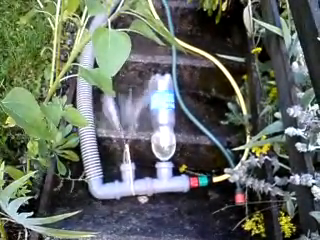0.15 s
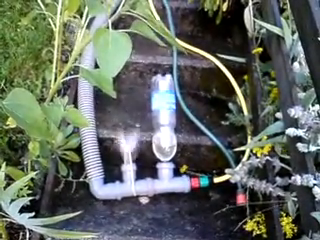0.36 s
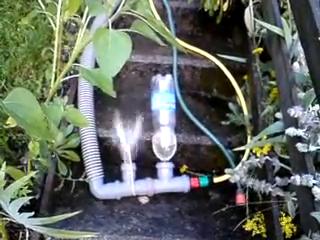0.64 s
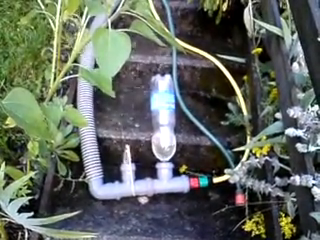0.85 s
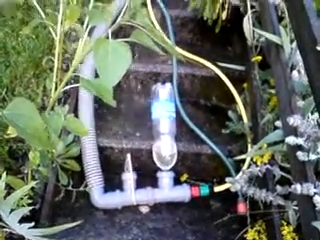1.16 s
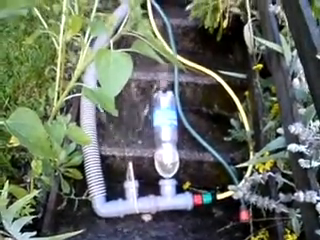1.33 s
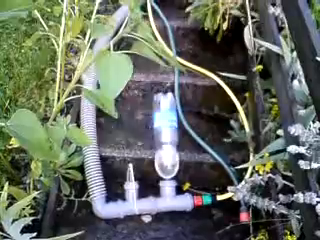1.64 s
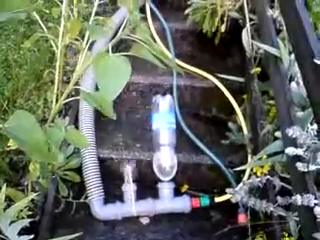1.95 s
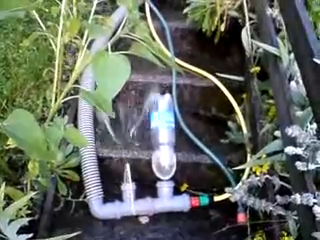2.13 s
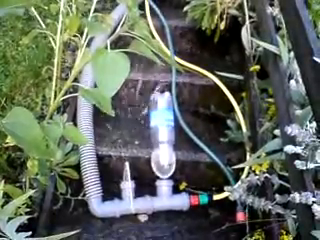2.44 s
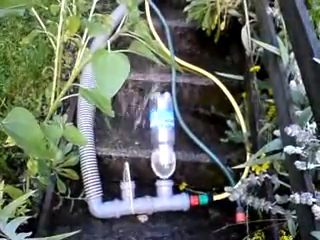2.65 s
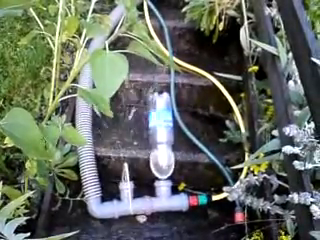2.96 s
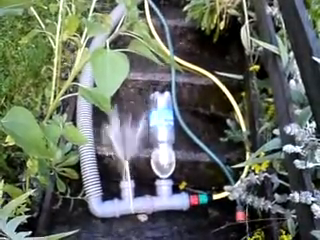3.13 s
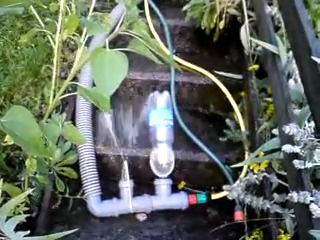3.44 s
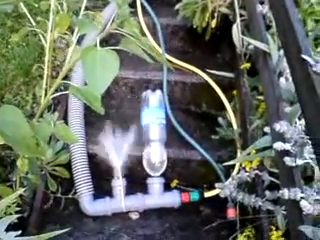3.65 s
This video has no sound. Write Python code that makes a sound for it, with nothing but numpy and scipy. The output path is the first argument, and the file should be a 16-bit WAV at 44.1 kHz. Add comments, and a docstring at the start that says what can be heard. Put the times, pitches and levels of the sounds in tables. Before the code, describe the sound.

Sharp, even clacks come from a small water pump on stone garden steps. Each quick cycle brings a hiss of water, a lighter shutting clack and a soft splash, with scattered drips and faint trickling behind.

```python
"""On stone garden steps, a small hydraulic ram pump cycles nearly four times a second.
Its waste valve drops open with a clack, water spurts out with a growing hiss and slams it shut
with a bounce, a knock in the pipe and a few bloops of air. The thrown water then splashes down
and stray drops tick on the wet stone, over a faint outdoor rumble and trickling run-off."""
import sys
import numpy as np
from scipy import signal
from scipy.fft import rfft, irfft
from scipy.io import wavfile

SR = 44100
rng = np.random.default_rng(int(sys.argv[2]) if len(sys.argv) > 2 else 0)


def store_wav(level_fs):
    """Save 16-bit WAV to argv[1]."""
    pcm = np.round(np.clip(np.atleast_2d(level_fs), -1, 1) * 32767)
    wavfile.write(sys.argv[1], SR, pcm.T.astype(np.int16))


N = 167139

# The valve drops open. Each row: time in seconds, level in dB, ring pitch in Hz, rise in seconds.
OPENINGS = [(0.195, -25.5, 3490, 0.0029), (0.4693, -25, 3700, 0.0012), (0.7408, -23.5, 3370, 0.0031),
            (1.0134, -25.7, 3510, 0.0024), (1.2857, -24, 3500, 0.0036), (1.5558, -25, 3500, 0.0013),
            (1.827, -25.5, 3410, .0019), (2.0989, -25, 3470, .0018), (2.3716, -24, 3550, 0.0023),
            (2.6442, -25.5, 3790, 0.0021), (2.9161, -25.5, 3650, 0.00072), (3.185, -26, 3900, 0.0017),
            (3.467, -23.5, 3410, 0.0022), (3.743, -25, 3710, 0.0027)]
# The valve slams shut. Each row: time in seconds, level in dB, ring pitch in Hz,
# relative level in dB of the jet that leads up to it.
SLAMS = [(0.0436, -27, 3720, -41), (0.3194, -28.5, 2920, -41), (0.5894, -31.5, 3140, -42),
         (0.8629, -31, 3620, -41), (1.136, -29, 3080, -41), (1.4058, -32, 3490, -42),
         (1.6771, -29, 3580, -42), (1.9487, -30, 3640, -41.5), (2.2195, -29.5, 3800, -41.5),
         (2.4948, -28.5, 3450, -40.5), (2.767, -28.5, 3570, -42.5), (3.0356, -29, 3430, -42),
         (3.3163, -29, 3350, -38.5), (3.5914, -33.5, 3600, -41)]


def amp(db):
    return 10 ** (np.asarray(db) / 20)


def unit_rms(x):
    return x / np.sqrt(np.mean(x ** 2) + 1e-20)


def sized(x, span_s):
    """Scales a short sound to the energy of rms 1 held for span_s."""
    return x / np.sqrt(np.sum(x ** 2) / (span_s * SR) + 1e-20)


def add(mix, start_s, sound):
    """Mixes a sound in, trimming whatever overhangs either end."""
    at = round(start_s * SR)
    part = mix[max(at, 0):max(at + len(sound), 0)]
    part += sound[max(-at, 0):][:len(part)]


def coloured(x, curve, size=4096):
    """Minimum-phase EQ through points of frequency in Hz and gain in dB."""
    hz, db = np.transpose(curve)
    bin_hz = abs(np.fft.fftfreq(size, 1 / SR)) + 1
    log_gain = np.log(amp(np.interp(np.log(bin_hz), np.log(hz), db)))
    taps = np.fft.ifft(np.exp(np.conj(signal.hilbert(log_gain)))).real[:size // 2]
    return signal.fftconvolve(x, taps)[:len(x)]


def flutter(rate_hz, depth_db):
    """A randomly wavering gain."""
    hz = np.fft.rfftfreq(N, 1 / SR)
    wander = irfft(rfft(rng.standard_normal(N)) / (1 + (hz / rate_hz) ** 4), N)
    return amp(depth_db * unit_rms(wander))


def droplets(per_s, spread_db):
    """Tiny random impacts of unequal size."""
    size = amp(spread_db * np.minimum(rng.exponential(1, N), 4))
    return unit_rms(size * rng.choice([-1, 1], N) * (rng.random(N) < per_s / SR))


def bubbles(per_s, spread_db, hz, octaves, cycles, count=36):
    """Tiny bubbles of many sizes, each a short ping that rises slightly."""
    births = np.flatnonzero(rng.random(N) < per_s / SR)
    pitch_index = rng.integers(0, count, N)
    gain = amp(spread_db * np.minimum(rng.exponential(1, N), 3.5))
    out, t = np.zeros(N + 600), np.arange(600) / SR
    for k, pitch_hz in enumerate(hz * 2 ** (octaves * np.linspace(-1, 1, count))):
        turns = pitch_hz * t
        envelope = (1 - np.exp(-turns)) * np.exp(-turns / cycles)
        ping = envelope * np.sin(2 * np.pi * turns * (1 + 0.001 * turns))
        starts = births[pitch_index[births] == k]
        samples = starts[:, None] + np.arange(len(t))
        out += np.bincount(samples.ravel(), np.outer(gain[starts], ping).ravel(), len(out))
    return unit_rms(out[:N])


def garden():
    """A faint bed of outdoor rumble and trickling run-off."""
    # The tone of the bed. Each row: frequency in Hz, gain in dB.
    bed_eq = [(20, -2.5), (45, 0), (65, 5.5), (90, -1), (200, -2.5), (280, -5), (550, -5), (850, 1),
              (1200, -2), (2400, 5.5), (3600, 8), (5000, -3.5), (8200, -13)]
    noise = rng.standard_normal(N) * flutter(rate_hz=25, depth_db=1)
    return amp(-57.5) * unit_rms(coloured(noise, bed_eq))


def step_echoes(x, count=5, predelay_s=0.004, t60_s=0.038):
    """Short scattered reflections off the stone steps, drifting from one pattern to the next."""
    out, t = np.zeros(N), np.arange(SR // 4) / SR
    decay = (t > predelay_s) * amp(-60 * t / t60_s)
    for k in range(count):
        taps = rng.choice([-1, 1], len(t)) * (rng.random(len(t)) < 3000 / SR) * decay
        crossfade = np.sqrt(np.maximum(1 - abs(np.linspace(0, count - 1, N) - k), 0))
        out += signal.fftconvolve(x * crossfade, taps / np.linalg.norm(taps))[:N]
    return amp(-12) * out


def ticks_and_drips():
    """Sharp ticks, mostly drops on stone, each a click, a noise burst and a ping, over small drips."""
    # Sharp ticks: drops on the stone, plus one valve bounce and one tick of the valve unseating.
    # Each row: start in seconds, level in dB, pitch in Hz.
    ticks = [(0.097, -40.5, 3840), (0.158, -45.5, 5400), (0.223, -38, 4030), (.392, -50, 3500),
             (0.623, -39.5, 3680), (0.71, -41, 4440), (0.984, -38, 4480), (0.998, -37.5, 2780),
             (1.092, -35, 3630), (1.221, -43, 2700), (1.352, -33.5, 3460), (1.367, -46, 3500),
             (1.793, -40, 4660), (1.866, -40, 4100), (2.066, -44, 4310), (2.146, -40, 3650),
             (2.185, -34, 3740), (2.352, -36.5, 3260), (2.439, -36, 3740), (2.62, -34.5, 4460),
             (2.665, -37, 2770), (2.677, -44, 3300), (2.689, -40, 3510), (2.722, -36, 3870),
             (2.85, -44, 3840), (2.878, -43.5, 4240), (2.883, -38.5, 4360), (2.962, -41.5, 4030),
             (3.019, -31, 3760), (3.12, -41, 2870), (3.139, -41.5, 3440), (3.166, -40.5, 3710),
             (3.221, -41, 4330), (3.255, -31, 3700), (3.41, -41.5, 5440), (3.503, -36.5, 2960),
             (3.526, -36.5, 3670), (3.542, -33.5, 3270), (3.612, -33, 3500), (3.758, -38.5, 2900),
             (3.768, -35, 3300)]
    # The tone of the ticks and drips. Each row: frequency in Hz, gain in dB.
    tick_eq = [(200, -28), (600, -30), (900, -27.5), (1200, -18.5), (2300, -5.5), (3600, -1), (4600, -2),
               (5500, -7.5), (7000, -7.5), (8300, -21)]
    out, t = np.zeros(N), np.arange(SR // 30) / SR
    click = unit_rms(1. * (t == 0))
    ping_envelope = (1 - np.exp(-t / 0.00035)) * np.exp(-t / 0.0026)
    glide_per_s = 6
    for s, db, hz in ticks:
        burst = unit_rms(rng.standard_normal(len(t)) * (1 - np.exp(-t / 0.001)) * np.exp(-t / 0.0031))
        body = unit_rms(signal.lfilter(*signal.iirpeak(hz, Q=1.1, fs=SR), burst))
        ping = unit_rms(ping_envelope * np.sin(2 * np.pi * hz * t * (1 + glide_per_s * t / 2)))
        hit = body + amp(-8) * burst + ping + amp(-10) * click
        add(out, s, amp(db) * sized(coloured(hit, tick_eq), span_s=0.0071))
    patter = bubbles(per_s=360, spread_db=4, hz=3500, octaves=0.87, cycles=3)
    out += amp(-56) * unit_rms(coloured(patter, tick_eq))
    drip_envelope = signal.fftconvolve(droplets(per_s=60, spread_db=2), t * np.exp(-t / 0.0022))[:N]
    drips = drip_envelope * rng.standard_normal(N)
    return out + amp(-61) * unit_rms(coloured(drips, tick_eq))


def splash(delay_s=0.041, spread_s=0.013):
    """The thrown water lands in a soft shower a moment after each slam."""
    # The tone of the shower. Each row: frequency in Hz, gain in dB.
    shower_eq = [(80, -23), (210, -10), (280, -28), (550, -17), (720, -6), (900, 1), (1020, -0.5),
                 (1200, -16), (1750, -0.5), (2300, -14), (3600, -8), (4600, -7), (6000, -15.5),
                 (8200, -36.5)]
    t = np.arange(N) / SR
    swells = sum(np.exp(-0.5 * ((t - s - delay_s) / spread_s) ** 2) for s, *_ in SLAMS)
    shower = unit_rms(coloured(droplets(per_s=1900, spread_db=2.5), shower_eq))
    return amp(-52.5) * swells * shower


def air_bloops(rise_s=0.0027, glide_per_s=3.5):
    """Pockets of air at the outlet give a few short bloops after each slam, each rising in pitch."""
    # The air pockets. Each row: delay in seconds, pitch in Hz, level in dB, 60 dB decay in seconds.
    pockets = [(.013, 803, -52, 0.033), (.039, 890, -49.5, 0.032), (.047, 817, -50.5, .045)]
    out, t = np.zeros(N), np.arange(SR // 12) / SR
    for s, *_ in SLAMS:
        for delay, hz, db, t60 in pockets:
            late, sharp, loud = rng.standard_normal(3)
            turns = hz * (1 + 0.05 * sharp) * t * (1 + glide_per_s * t / 2)
            envelope = np.minimum(t / rise_s, 1) * amp(db + loud - 60 * t / t60)
            add(out, s + delay + 0.0012 * late, envelope * np.sin(2 * np.pi * turns))
    return out


def jet(lead_s=0.077, rise_s=0.027, growth_db_per_s=32, fall_db_per_s=340.5):
    """Water seeps through the open valve, bursts into a growing spray and dies away after the slam."""
    # The tone of the hiss. Each row: frequency in Hz, gain in dB.
    hiss_eq = [(80, -38), (500, -34.5), (800, -30.5), (1300, -29), (1600, -23.5), (1900, -13), (2200, -15),
               (2850, -6), (3200, -5.5), (3450, -2.5), (3700, -3), (4000, -2.5), (4350, -8.5), (4900, -8.5),
               (5500, -16), (6500, -15), (8200, -28.5)]
    flow, t = np.zeros(N), np.arange(N) / SR
    for s, _, _, db in SLAMS:
        before, after = np.maximum(s - t, 0), np.maximum(t - s, 0)
        spurt = np.clip((lead_s - before) / rise_s, 0, 1)
        seep = amp(-12.5) * np.clip((0.125 - before) / 0.004, 0, 1)
        flow += np.maximum(spurt, seep) * amp(db + 4 - growth_db_per_s * before - fall_db_per_s * after)
    froth = bubbles(per_s=1600, spread_db=8, hz=3500, octaves=1, cycles=3.8)
    spray = droplets(per_s=9000, spread_db=1) + amp(-12.5) * froth
    spray *= flutter(rate_hz=43, depth_db=-0.05)
    # Slugs of water ring the outlet.
    sputter = bubbles(per_s=260, spread_db=1, hz=3650, octaves=0.13, cycles=7)
    return flow * (unit_rms(coloured(spray, hiss_eq)) + amp(-7) * sputter)


def pipe_knock():
    """One blow to the water-filled pipe; its low modes swell more slowly."""
    # The pipe's modes. Each row: pitch in Hz, level in dB, 60 dB decay in seconds, rise in seconds.
    modes = [(143, -63, 0.043, 0.017), (201.3, -58, 0.062, 0.01), (305, -68.5, 0.052, 0.016),
             (448, -62, 0.065, 0.0055), (503, -60.5, 0.036, 0.005), (708, -47, 0.036, 0.0038),
             (905.4, -58.5, 0.15, 0.0043)]
    t = np.arange(SR // 5) / SR
    out = np.zeros(len(t))
    for hz, db, t60, rise in modes:
        envelope = np.minimum(t / rise, 1) * amp(db - 60 * np.maximum(t - rise, 0) / t60)
        detune = 1 + 0.028 * rng.standard_normal()
        out += envelope * np.sin(2 * np.pi * (hz * detune * t + rng.random()))
    return out


def water_hammer(lead_s=0.003075):
    """The stopped water column knocks the pipe; the opening valve knocks it more lightly."""
    out = np.zeros(N)
    for s, *_ in SLAMS:
        add(out, s - lead_s, pipe_knock())
    for s, *_ in OPENINGS:
        add(out, s - lead_s, amp(-12.5) * pipe_knock())
    return out


def clack(hz, body_eq, rise_s, fall_s, chatter_db, chatter_s=0.008, ring_db=-2, tick_db=-11):
    """The poppet scrapes into its stop, hits, rings and chatters; the blow lands mid-buffer."""
    t = np.arange(-2048, 2048) / SR
    before, after = np.maximum(-t, 0), np.maximum(t, 0)
    scrape_s = 0.008
    approach = np.exp(-before / rise_s - (before / scrape_s) ** 4)
    blow = approach * np.exp(-after / fall_s)
    chatter = amp(chatter_db) * approach * np.exp(-after / chatter_s)
    grit = unit_rms((blow + chatter) * rng.choice([-1, 1], len(t)))
    tick = amp(tick_db) * unit_rms(1. * (t == 0))
    body = unit_rms(coloured(grit + tick, body_eq))
    ring = unit_rms(blow * np.sin(2 * np.pi * (hz * t + rng.random())))
    return sized(body + amp(ring_db) * ring, span_s=0.01)


def waste_valve(unseat_lead_s=0.013, bounce_delay_s=0.0232):
    """The poppet unseats with a tick and clacks open; it shuts with a lighter clack and one bounce."""
    # The valve body's resonances on opening and on shutting. Each row: frequency in Hz, gain in dB.
    open_eq = [(60, -35), (170, -33), (300, -34.5), (600, -38.5), (930, -26), (1100, -37.5), (1350, -22),
               (1700, -30), (1900, -12.5), (2150, -14.5), (2450, -5), (2650, -10), (2850, -4), (3250, -7.5),
               (3450, 0), (3900, -0.5), (4400, -15), (5400, -20), (6200, -27.5), (7500, -28.5), (8500, -38)]
    shut_eq = [(300, -33.5), (900, -35.5), (1150, -22.5), (1350, -16.5), (1600, -29), (1950, -13.5),
               (2250, -13.5), (2850, 2), (3200, -9.5), (3700, 7), (4300, -12), (5000, -9.5), (5600, -21),
               (6600, -19), (8300, -32.5)]
    out = np.zeros(N)
    for s, db, hz, rise_s in OPENINGS:
        hit = clack(hz, open_eq, rise_s, fall_s=0.0018, chatter_db=-12.5, chatter_s=0.0075,
                    ring_db=-2.5, tick_db=-10)
        start = s - len(hit) / 2 / SR
        add(out, start, amp(db) * hit)
        unseat_start = start - unseat_lead_s + 0.0035 * rng.standard_normal()
        add(out, unseat_start, amp(db - 23.5) * hit)
    for s, db, hz, _ in SLAMS:
        hit = clack(hz, shut_eq, rise_s=0.0011, fall_s=0.0017, chatter_db=-12)
        start = s - len(hit) / 2 / SR
        add(out, start, amp(db) * hit)
        bounce = clack(3650, shut_eq, rise_s=0.0008, fall_s=0.0016, chatter_db=-22)
        bounce_start = start + bounce_delay_s + 0.0008 * rng.standard_normal()
        add(out, bounce_start, amp(-38.5 + rng.standard_normal()) * bounce)
    return out


def scene():
    """The pump and its water, reflected off the steps, over the garden bed, in mono."""
    pump = waste_valve() + water_hammer() + air_bloops() + jet() + splash() + ticks_and_drips()
    return (pump + step_echoes(pump) + garden())[None]


def record(dry):
    """A steep low-pass takes off the top end."""
    cutoff_hz = 8550
    lowpass = signal.firwin(161, cutoff_hz, window=("kaiser", 8), fs=SR)
    return signal.oaconvolve(dry, lowpass[None], "same")


dry = scene()
out = record(dry)
store_wav(out)
```